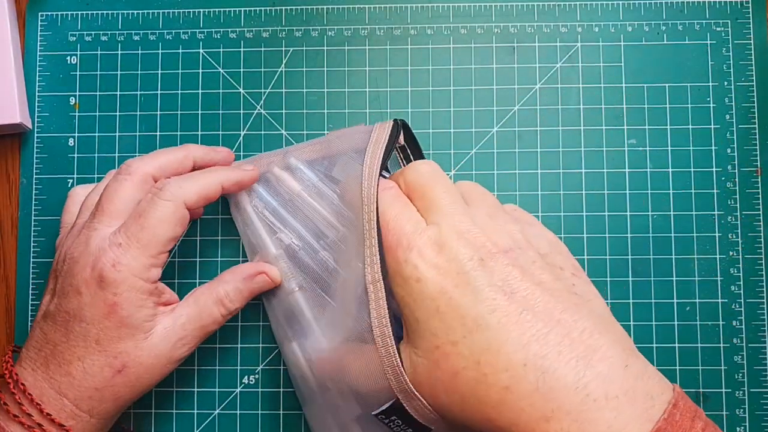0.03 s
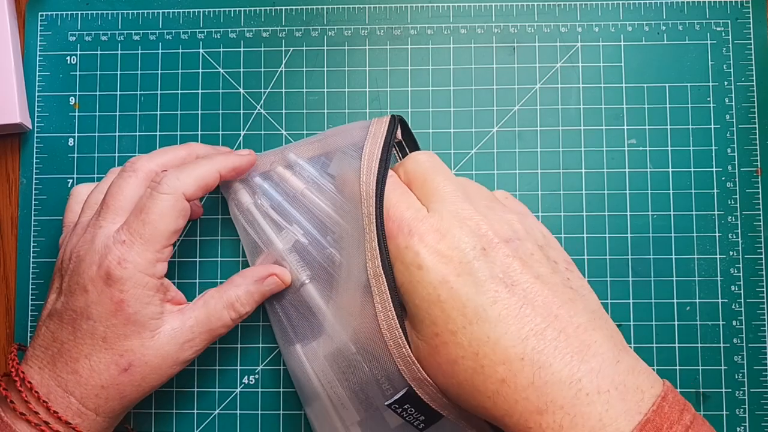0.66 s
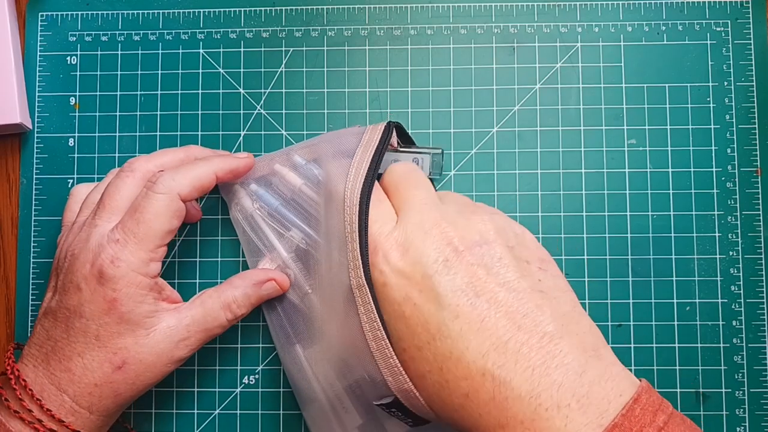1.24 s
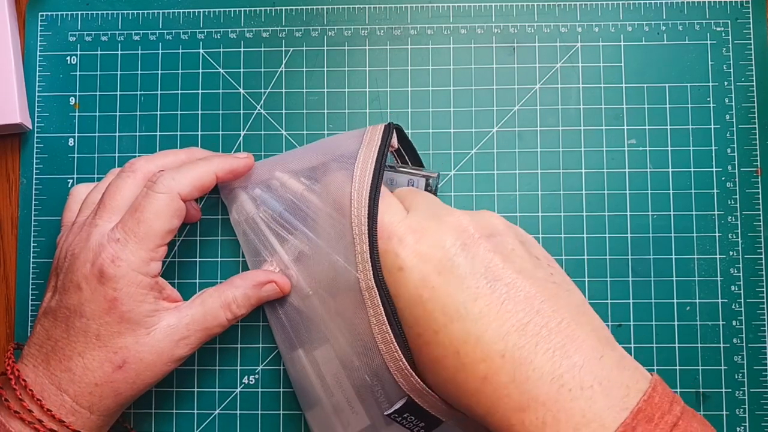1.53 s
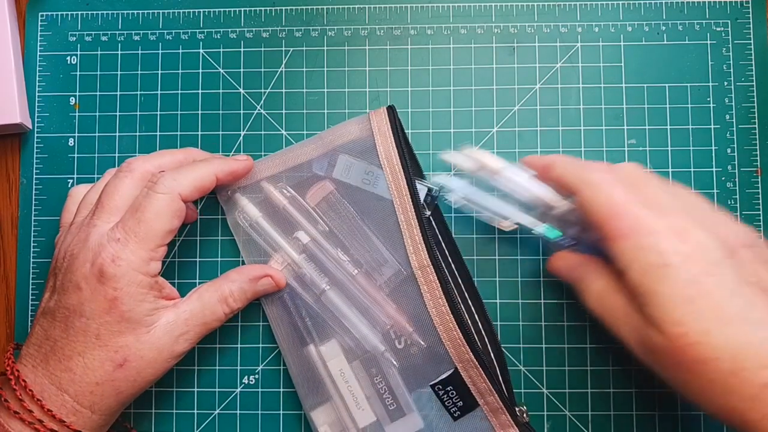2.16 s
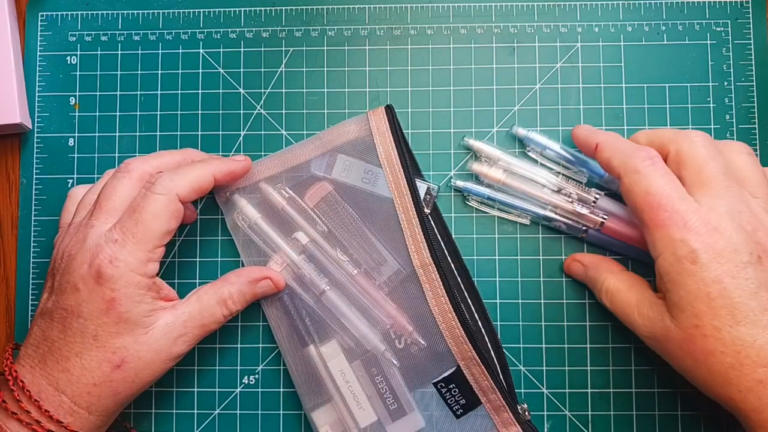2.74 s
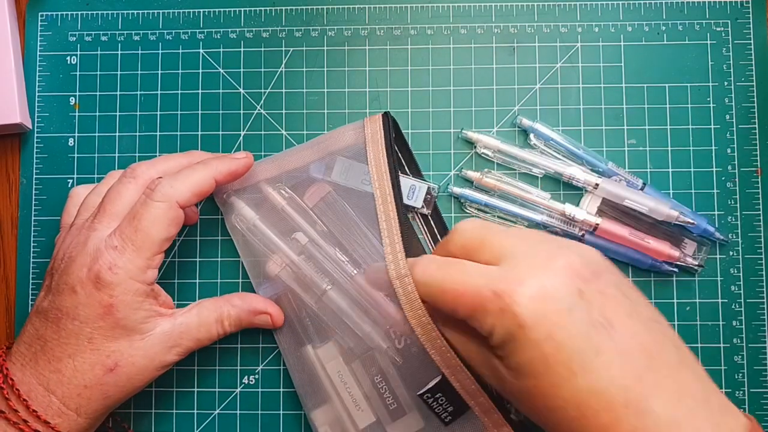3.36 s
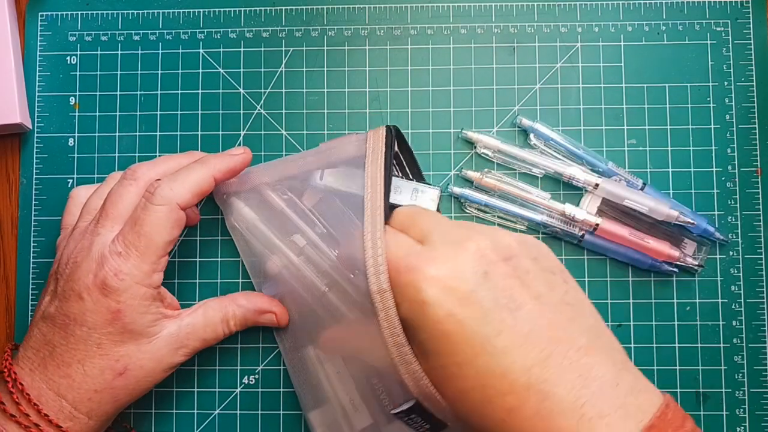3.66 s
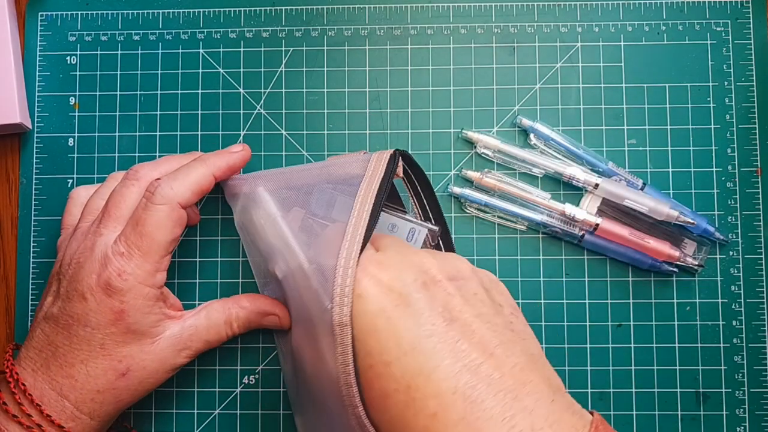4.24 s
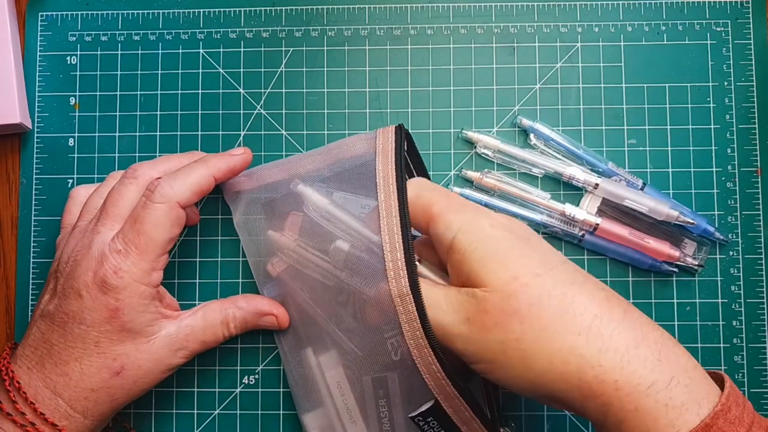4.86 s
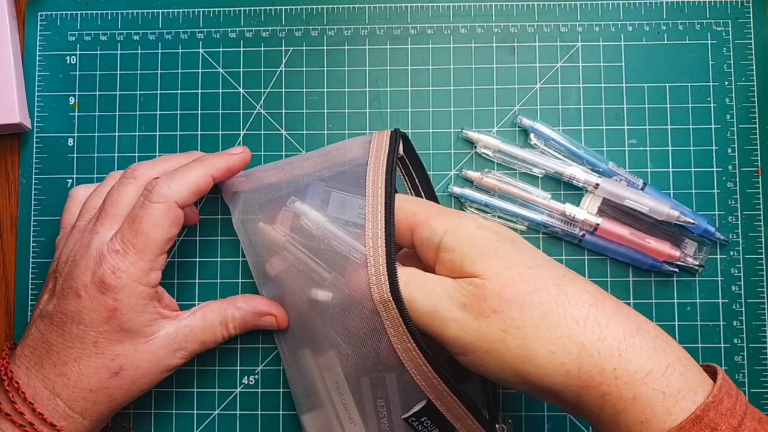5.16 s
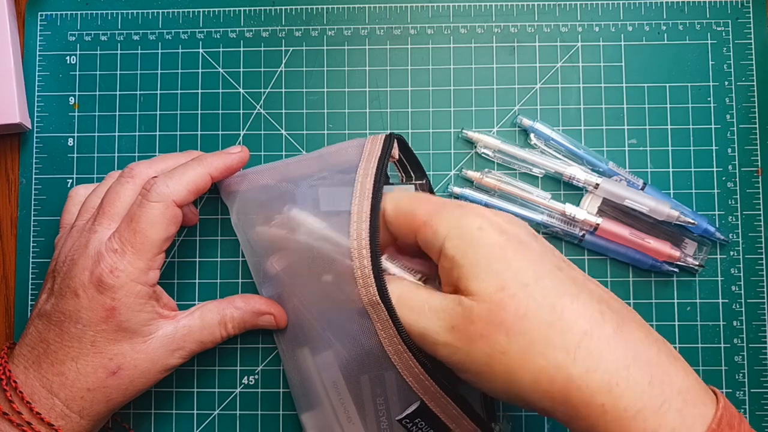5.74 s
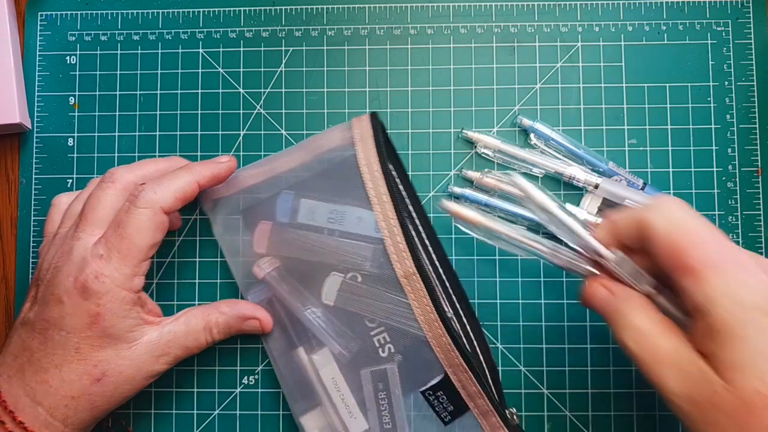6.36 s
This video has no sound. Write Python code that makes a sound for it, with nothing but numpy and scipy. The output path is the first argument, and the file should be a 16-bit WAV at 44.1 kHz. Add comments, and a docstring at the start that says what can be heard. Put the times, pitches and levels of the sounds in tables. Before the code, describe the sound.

A hand rummages in a soft plastic pouch, close and left of centre, with pens and pencils ticking together and the plastic crinkling. An engine idles faintly outside and stops. A bunch of pens is set down on a mat, clacking and rolling together with dull bumps on the desk. The digging resumes with more clicks and scrapes while a car passes faintly in the street. The stereo sound is close, in a small room.

```python
"""A desk in a small room, close stereo microphones. Left of centre a hand rummages in a soft plastic
zipper pouch: pens and pencils tick against each other, the film crinkles; an engine idles faintly outside.
At 2.3 s a bunch is set down on a cutting mat near the centre, where the hollow barrels clack and roll
together, and the engine stops. From 3.2 s the hand digs again, while out on the street a car goes by,
nearest at about 5 s and falling in pitch. The walls answer every contact briefly."""
import sys
import numpy as np
from scipy import signal
from scipy.fft import rfft, irfft, next_fast_len
from scipy.io import wavfile
from scipy.ndimage import map_coordinates

SR = 44100
rng = np.random.default_rng(int(sys.argv[2]) if len(sys.argv) > 2 else 0)


def wav_record(signal):
    """Record a signal, one row per channel, as 16-bit PCM in the file named by sys.argv[1]."""
    frames = np.transpose(np.atleast_2d(signal))
    bounded = np.clip(frames, -1, 1)
    # unit amplitude maps onto the largest positive 16-bit level
    quanta = np.round(bounded * 32767).astype(np.int16)
    wavfile.write(sys.argv[1], SR, quanta)


N = 286650


# the clearest contacts inside the pouch: start_s, barrel_db, click_db, tick_db, pitch_hz
POUCH_HITS = [(0.0341, -46, -51, -34.5, 3100), (0.2176, -82, -75, -48, 1300), (0.441, -69, -57, -52, 1800),
              (0.4715, -56.5, -50.5, -42.5, 2370), (0.6331, -71.5, -72, -42.5, 1510),
              (0.801, -62, -53, -43, 1900), (0.8063, -56, -44.5, -42, 2600),
              (0.8122, -55, -45, -32.5, 2900), (1.0621, -35, -36, -32, 4940), (1.1968, -78, -70, -52, 1800),
              (1.242, -47, -47, -32.5, 3480), (1.2542, -47, -42, -30, 2900), (1.2911, -50, -53, -49, 3200),
              (1.3218, -46.5, -46, -48, 3280), (1.35, -43, -41.5, -42.5, 2620),
              (1.4159, -47, -35.5, -29.5, 2600), (1.5298, -39, -43.5, -47, 3150),
              (1.5822, -54, -52, -42, 2700), (1.6695, -32, -33.5, -38, 3720),
              (1.7419, -58, -46.5, -50, 3480), (2.2633, -45.5, -45.5, -45.5, 4400),
              (3.2354, -70, -51.5, -42, 2560), (3.5491, -48.5, -44, -34, 1290),
              (3.6853, -61, -49, -39, 2730), (3.822, -49, -42, -33, 2770),
              (4.0871, -35.5, -34.5, -28, 2540), (4.1113, -43, -38, -31, 2670),
              (4.1566, -39.5, -38, -43, 3050), (4.1776, -45.5, -32.5, -36, 2420),
              (4.4854, -48, -58, -51, 2700), (4.6814, -53, -44, -49, 1800),
              (4.7061, -45.5, -39, -29.5, 2500), (4.7329, -42, -39.5, -32.5, 1935),
              (4.768, -48.5, -43.5, -38, 1580), (4.8245, -51.5, -43.5, -32.5, 1387),
              (5.2267, -57, -64.5, -47.5, 1500), (5.3387, -68, -59, -46, 1480),
              (5.394, -46.5, -37, -28.5, 2380), (5.4021, -43.5, -39, -31, 2240),
              (5.4461, -50, -43.5, -42, 2740), (5.5242, -53, -50, -37.5, 1800),
              (5.578, -49.5, -47, -39, 2180), (5.645, -80.5, -52, -49, 1510), (5.7137, -54, -53, -45, 2280),
              (5.7481, -46, -39, -41.5, 2520), (5.8947, -37.5, -36.5, -43, 3070),
              (5.9094, -36, -32.5, -43, 2700), (5.9513, -30, -29, -28, 3330),
              (5.9713, -62, -37.5, -33, 3100), (6.0168, -38.5, -40, -39, 2600)]
# spectrum of the desk knocked through the pouch: frequency_hz, level_db
POUCH_KNOCK_SPECTRUM = [(40, -17), (110, -16), (220, 7.5), (370, -0.5), (520, -2.5), (800, -11.5),
                        (1200, -0.5), (1700, 2), (2500, -14)]

def pouch_contacts():
    """Close, left of centre: pens jostle inside the pouch, damped by the grip."""
    hits = np.vstack([POUCH_HITS, light_touches()])
    return amp(0.5) * clatter(
        hits, pan_db=7.5, lag_s=.00012, barrel_t60=.009, click_t60=.0055, after_db=-59,
        near_db=-7, far_db=-7, knock_spectrum=POUCH_KNOCK_SPECTRUM, knock_db=-5.5, knock_t60=0.064)


# clacks of the bunch on the mat: start_s, barrel_db, click_db, tick_db, pitch_hz
MAT_HITS = [(2.3372, -44.5, -48.5, -51.5, 2660), (2.3714, -33, -46, -41, 2180),
            (2.385, -35.5, -44, -43, 2120), (2.395, -29, -37, -29.5, 2180),
            (2.4339, -27, -41.5, -33.5, 2420), (2.4581, -45.5, -51, -48, 2370),
            (2.4766, -48, -44.5, -50, 1200), (2.5645, -39, -45.5, -54, 2270),
            (2.5844, -43, -39.5, -39.5, 1620), (2.5998, -36, -42.5, -36, 2150),
            (2.6267, -40, -39, -26.5, 2190), (2.6365, -37.5, -51, -34, 1960),
            (2.6754, -39.5, -44, -45, 2070), (2.6943, -42.5, -41.5, -43, 2300),
            (2.7016, -38.5, -38.5, -30, 2270), (2.7203, -35, -37, -41, 2270),
            (2.7696, -34.5, -39, -36, 2930), (2.7766, -36.5, -37.5, -31, 2370),
            (2.8181, -37, -46, -48, 2000), (2.847, -42.5, -53, -50, 2900), (2.8554, -38, -44, -44, 2040),
            (2.8999, -45, -51.5, -50, 2110), (2.9782, -66, -54, -51, 2600)]
# spectrum of the desk knocked through the mat: frequency_hz, level_db
MAT_KNOCK_SPECTRUM = [(40, -26), (110, 3.5), (200, -14.5), (300, -5), (385, 0.5), (470, -2.5), (560, -4.5),
                      (680, -17), (800, -33), (1080, 5.5), (1300, -9.5), (2500, -19)]

def mat_contacts():
    """Close, near the centre: freed barrels keep a stronger after-ring and shake the mat."""
    return amp(-0.5) * clatter(
        MAT_HITS, pan_db=2, lag_s=.00001, barrel_t60=0.0072, click_t60=.007, after_db=-35,
        near_db=-9, far_db=-5.5, knock_spectrum=MAT_KNOCK_SPECTRUM, knock_db=-1, knock_t60=0.16)


def clatter(hits, pan_db, lag_s, barrel_t60, click_t60, after_db, near_db, far_db,
            knock_spectrum, knock_db, knock_t60):
    """Contacts and their echoes, later and softer on the right; each also knocks dully on the desk."""
    pens, knocks = np.zeros((2, 2, N))
    t = np.arange(SR // 5) / SR
    for start_s, barrel_db, click_db, tick_db, pitch_hz in hits:
        pair = contact(barrel_db, click_db, tick_db, pitch_hz, barrel_t60, click_t60, after_db)
        add(pens[:1], start_s, pair[:1])
        add(pens[1:], start_s + lag_s, pair[1:] * amp(-pan_db))
        add(pens, start_s, room(pair[0], near_db, far_db) * amp([[0], [-pan_db / 3]]))
        force = amp(knock_db + (barrel_db + click_db) / 2)
        shake = rng.standard_normal(len(t)) + 0.53 * rng.standard_normal((2, len(t)))
        add(knocks, start_s, force * amp(-60 * t / knock_t60) * shake)
    return pens + coloured(knocks, knock_spectrum)


# bending modes of the hollow barrels: frequency_hz, level_db
BARREL_MODES = [(1090, 9.5), (1330, -2), (1610, 2.5), (1702, 4), (1779, -0.5), (1906, 0.5), (2034, -9.5),
                (2116, -3), (2194, 1), (2317, -0.5), (2424, -2), (2548, -1.5), (2833, -8.5), (3138, 5),
                (3420, 0), (3725, -2), (4150, -4), (4520, 6.5), (4950, -6)]

def contact(barrel_db, click_db, tick_db, pitch_hz, barrel_t60, click_t60, after_db, width_octaves=0.3):
    """One touch: the barrel modes near its pitch, plus the snap of clips, tips and caps."""
    hz, db = np.transpose(BARREL_MODES)
    favoured_db = -3 * (np.log2(hz / pitch_hz) / width_octaves) ** 2
    detuned_hz = hz * (1 + 0.0083 * rng.standard_normal(len(hz)))
    barrel = ring(detuned_hz, db + favoured_db, barrel_t60, after_db)
    thin = signal.butter(2, 1150, "highpass", fs=SR, output="sos")  # a thin tube radiates little bass
    sound = amp(barrel_db) * signal.sosfilt(thin, barrel)
    click = amp(click_db) * snap(band_hz=(3900, 9800), t60=click_t60, correlation=0.72)
    tick = amp(tick_db) * snap(band_hz=(10500, 17000), t60=click_t60, correlation=0.34)
    add(sound, 0, click + tick)
    return sound


def ring(hz, db, t60, after_db, after_t60=0.12):
    """Struck modes at both microphones: damped at once, they leave a faint after-ring."""
    t = np.arange(SR // 8) / SR
    gain = amp(db + 2 * rng.standard_normal(len(hz)))
    left = gain * np.exp(2j * np.pi * rng.random(len(hz)))
    right = left * np.exp(0.23j * rng.standard_normal(len(hz)))  # each mode radiates its own way
    waves = np.array([left, right]) @ np.exp(2j * np.pi * hz[:, None] * t)
    decay = amp(-60 * t / t60) + amp(after_db - 60 * t / after_t60)
    attack = 1 - np.exp(-t / .0001)
    return unit_blow(waves.imag * decay * attack)


def snap(band_hz, t60, correlation):
    """A dry burst: small hard parts have crowded modes that die within milliseconds."""
    t = np.arange(SR // 16) / SR
    envelope = amp(-60 * t / t60) * (1 - np.exp(-t / 0.0012))
    left, other = rng.standard_normal((2, len(t))) * envelope
    right = correlation * left + np.sqrt(1 - correlation ** 2) * other
    band = signal.butter(2, band_hz, "bandpass", fs=SR, output="sos")
    return unit_blow(signal.sosfilt(band, [left, right]))


# how hard the hand rummages: time_s, level_db
HAND_EFFORT = [(0.0, -72.5), (0.25, -80.5), (0.45, -75.5), (0.78, -78.5), (1.0, -64.5), (1.45, -62),
               (1.95, -74.5), (2.1, -88), (3.3, -85), (3.7, -69), (4.05, -68), (4.27, -61), (4.56, -79),
               (4.84, -70.5), (5.2, -82), (5.47, -63), (5.85, -70), (6.12, -80)]
# spectrum of the rubbed plastic film: frequency_hz, level_db
FILM_SPECTRUM = [(300, -22), (1200, -7.5), (2000, -12.5), (2800, -4.5), (3800, -6), (4500, 0), (5500, -5.5),
                 (8000, 1.5), (10000, -5.5), (13000, 5.5), (16000, -7.5)]

def rustle():
    """At the pouch, skin and pens slide unevenly on the film: a soft hiss with tiny crinkles."""
    grip = amp(1.5 * wobble(16) + 1.2 * wobble(70))
    slide = amp(1) * noise(FILM_SPECTRUM, side_db=1, pan_db=8)
    crinkles = slips(FILM_SPECTRUM, per_second=260, size_db=5)
    return amp(curve(HAND_EFFORT) + 1) * grip * (slide + crinkles)


def light_touches(count=40, crowding=0.68, scatter_db=3, pitch_hz=2600):
    """Rows of chance contacts as the hand stirs the pens: more effort makes them denser and louder."""
    effort_db = curve(HAND_EFFORT)
    stirred = np.cumsum(amp(crowding * effort_db))
    starts = np.searchsorted(stirred / stirred[-1], (np.arange(count) + rng.random(count)) / count)
    chance = rng.standard_normal((count, 4))
    levels_db = effort_db[starts, None] + [4, 11, 15] + scatter_db * chance[:, :3]  # barrel, click, tick
    return np.column_stack([starts / SR, levels_db, pitch_hz * 2 ** (.3 * chance[:, 3])])


# pens dragged over each other and the film: start_s, length_s, hiss_db, barrel_db
PEN_DRAGS = [(.002, 0.043, -47, -54.5), (0.799, 0.088, -47, -58.5), (1.039, 0.057, -43, -48),
             (1.236, 0.058, -54, -64), (1.582, 0.17, -47.5, -57.5), (2.443, 0.045, -52, -47),
             (2.574, 0.12, -42.5, -50), (2.684, 0.16, -57, -52.5), (3.224, 0.077, -56, -82),
             (3.511, 0.069, -47.5, -84), (3.79, 0.077, -44, -65), (4.034, 0.19, -42.5, -55),
             (4.083, 0.05, -39.5, -53), (4.339, 0.055, -51.5, -55), (4.699, 0.034, -43.5, -51.5),
             (5.383, 0.059, -43.5, -61), (5.72, 0.046, -55, -57), (5.837, 0.2, -43.5, -46),
             (6.238, .36, -56, -75)]
# spectrum of a skidding barrel: frequency_hz, level_db
SKID_SPECTRUM = [(400, -15.5), (1200, -7), (2000, -11.5), (2500, 8), (2850, 3.5), (3200, -3.5), (3800, 1),
                 (4400, -2), (5300, -3.5), (7000, -22), (16000, -35)]

def scrapes(catch_db=2.5, catches_per_second=55):
    """Close, on the left: a dragged pen catches and slips; the film hisses, the barrel rasps."""
    film_swells = sum(amp(db) * swell(s, length) for s, length, db, _ in PEN_DRAGS)
    barrel_swells = sum(amp(db) * swell(s, length) for s, length, _, db in PEN_DRAGS)
    catching = amp(catch_db * wobble(catches_per_second))
    hiss = film_swells * slips(FILM_SPECTRUM, per_second=1400, size_db=4.5)
    rasp = barrel_swells * slips(SKID_SPECTRUM, per_second=600, size_db=3.5)
    return catching * (hiss + rasp)


def slips(spectrum, per_second, size_db):
    """Dense tiny stick-slip grains with their echoes, rms 1."""
    slipping = rng.random(N) < per_second / SR
    sizes = amp(size_db * np.minimum(rng.exponential(size=N), 3))
    grains = slipping * sizes * rng.choice([-1, 1], N)
    direct = np.array([grains, np.roll(grains, 5) * amp(-4)])  # later and softer on the right
    echoes = room(grains, near_db=-4, far_db=-0.95)[:, :N]
    return unit(coloured(direct + echoes, spectrum))


# soft bumps of pens and knuckles, in the pouch and on the mat: start_s, level_db
BUMPS = [(.008, -52.5), (.842, -54.5), (1.063, -53.5), (1.262, -53.5), (1.362, -57.5), (1.715, -65.5),
         (2.395, -53), (2.601, -55), (2.634, -51.5), (2.724, -48), (2.777, -46.5), (4.099, -53),
         (5.951, -48)]
# spectrum of the desk's boom: frequency_hz, level_db
BOOM_SPECTRUM = [(40, -34), (110, 6), (170, -3.5), (240, 0.5), (300, 0), (380, 4), (460, 0.5), (560, -9),
                 (660, -8), (800, -17), (1500, -47)]

def thuds(t60=0.2):
    """Close, centred: each bump of the hand, in the pouch or on the mat, becomes a dull boom of the desk."""
    bumps = np.zeros((2, N))
    t = np.arange(SR // 4) / SR
    for start_s, db in BUMPS:
        shake = rng.standard_normal(len(t)) + 0.29 * rng.standard_normal((2, len(t)))
        add(bumps, start_s, amp(db - 60 * t / t60) * shake)
    band_gain = rms(amp(along(BOOM_SPECTRUM, np.linspace(0, SR / 2, SR))))
    return coloured(bumps, BOOM_SPECTRUM) / band_gain


# brief faint low hums: start_s, length_s, pitch_hz, level_db
LOW_HUMS = [(0.338, 0.16, 310, -70), (4.19, 0.11, 240, -61), (6.292, 0.16, 141.7, -63)]
# spectrum of the rumbling desk: frequency_hz, level_db
DESK_SPECTRUM = [(20, -16.5), (45, -1), (90, 1.5), (140, 0), (185, -6.5), (240, -0.5), (320, -15.5),
                 (420, -13.5), (600, -21.5), (1500, -46.5)]

def desk_rumble(rest_db=-71, easy_search_db=-70):
    """The desk rumbles with the hand's effort and with every drag; now and then a low hum swells."""
    t = np.arange(N) / SR
    hums = sum(amp(db) * swell(s, length) * unit(np.sin(2 * np.pi * hz * t + 0.43 * wobble(40)))
               for s, length, hz, db in LOW_HUMS)
    push = amp(easy_search_db + 0.49 * (curve(HAND_EFFORT) - easy_search_db))
    drags = sum(amp(db - 22) * swell(s, length) for s, length, db, _ in PEN_DRAGS)
    shaking = np.sqrt(amp(rest_db) ** 2 + push ** 2 + drags ** 2)
    sway = amp(2 * wobble(8.7))
    return shaking * sway * noise(DESK_SPECTRUM, side_db=-11, pan_db=2) + hums


# decay of the small room: frequency_hz, t60_s
WALL_DECAY = [(200, 0.097), (2000, 0.25), (6000, 0.16), (15000, 0.12)]
# spectrum of its echo: frequency_hz, level_db
WALL_SPECTRUM = [(200, 20), (2000, -1.5), (5000, -0.5), (9000, -1.5), (15000, -0.5)]

def room(sound, near_db, far_db, near_t60=0.018, wall_gap_s=.0085):
    """Quick scatter from desk and hands, then the walls' tail; new for each place."""
    hz, t, bins = signal.stft(rng.standard_normal((2, SR // 3)), SR, nperseg=256)
    fade = amp(along(WALL_SPECTRUM, hz)[:, None] - 60 * t / along(WALL_DECAY, hz)[:, None])
    tail = signal.istft(bins * fade, SR, nperseg=256)[1]
    t = np.arange(tail.shape[1]) / SR
    tail *= 1 - np.exp(-(t / wall_gap_s) ** 4)
    near = rng.standard_normal(tail.shape) * amp(-60 * t / near_t60)
    near *= 1 - np.exp(-(t / 0.0029) ** 2)
    answer = amp(far_db) * tail / np.linalg.norm(tail[0]) + amp(near_db) * near / np.linalg.norm(near[0])
    return signal.fftconvolve(sound[None], answer, axes=1)


# tyre noise of the passing car: time_s, level_db
TYRE_LEVELS = [(3.5, -73), (3.7, -68), (4.2, -59), (4.45, -68.5), (4.85, -55.5), (5.2, -64), (5.84, -63),
               (6.5, -74)]
# spectra of its motor, near tyres, far tyres and singing tread: frequency_hz, level_db
MOTOR_SPECTRUM = [(25, -29), (45, -12.5), (70, -5), (93, -3), (115, -7.5), (170, -22), (400, -44)]
NEAR_TYRE_SPECTRUM = [(200, -20), (420, -2), (560, -2.5), (690, 2.5), (830, 11), (920, 2.5), (1020, -0.5),
                      (1230, 2.5), (1450, -6.5), (1800, -5.5), (2600, -19), (5000, -54)]
FAR_TYRE_SPECTRUM = [(200, -13.5), (400, -18.5), (650, -7.5), (830, -3), (1000, -3.5), (1200, -1),
                     (1450, 0.5), (1750, -5), (2300, -12.5), (3500, -30.5), (8000, -51)]
TREAD_SPECTRUM = [(600, -26.5), (770, -15.5), (825, 8), (880, -6.5), (1100, -55)]

def passing_car(start_s=2.87, attack_s=1.0, leave_s=4.63, release_s=0.21):
    """Out on the street a motor drones as it comes on; the tyres sing and grow fuller as they near."""
    t = np.arange(N) / SR
    coming = np.clip((t - start_s) / attack_s, 0, 1)
    leaving = np.exp(-np.maximum(t - leave_s, 0) / release_s)
    motor = amp(-61) * coming * leaving * noise(MOTOR_SPECTRUM, side_db=-5, pan_db=4.5)
    tyre_db = curve(TYRE_LEVELS)
    nearness = np.clip((tyre_db - tyre_db.max()) / 11 + 1.5, 0, 1)
    near = noise(NEAR_TYRE_SPECTRUM, side_db=-4.5, pan_db=0.65)
    far = noise(FAR_TYRE_SPECTRUM, side_db=2.4, pan_db=5.9)
    tread = amp(-9) * noise(TREAD_SPECTRUM, side_db=-18.5, pan_db=0.5)
    tyres = np.sqrt(nearness) * (near + tread) + np.sqrt(1 - nearness) * far
    return motor + amp(tyre_db + wobble(7.4)) * tyres


# the tyres' roar as the car passes the room: time_s, pitch_hz, level_db
ROAR_GLIDE = [(3.4, 827, -100), (4.2, 826, -69), (4.549, 786.4, -70.5), (4.749, 737, -61),
              (4.921, 651, -63.5), (5.08, 571, -69), (5.4, 520, -95.5)]

def tyre_roar(width_hz=260):
    """From the street, a narrow roar that glides down with the Doppler shift."""
    glide = np.array(ROAR_GLIDE)
    phase = 2 * np.pi * np.cumsum(curve(glide[:, [0, 1]])) / SR
    roar = unit(wobble(width_hz) * np.cos(phase) + wobble(width_hz) * np.sin(phase))
    return roar * amp(curve(glide[:, [0, 2]])) * amp([[1], [-1]])


# hum of the idling engine: time_s, level_db
IDLE_LEVELS = [(0.0, -61.5), (0.3, -86), (0.62, -73), (0.8, -61), (1.42, -54), (2.39, -65), (2.5, -81)]

def idling_engine(pitch_hz=67.2, stop_s=2.55, fade_s=0.16):
    """Outside, to the left, an engine hums, then stops."""
    phase = 2 * np.pi * np.cumsum(pitch_hz + 0.61 * wobble(4.87)) / SR
    running = np.clip((stop_s - np.arange(N) / SR) / fade_s, 0, 1)
    hum = unit(np.sin(phase) + amp(-14) * np.sin(2 * phase))
    return hum * running * amp(curve(IDLE_LEVELS) + wobble(11)) * amp([[0.5], [-5.5]])


# wash of distant traffic: time_s, level_db
TRAFFIC_LEVELS = [(0.0, -70.5), (1.5, -76), (2.2, -85), (6.5, -78)]

def distant_traffic():
    """Far off, tyres blend into a wide, faint wash."""
    return amp(curve(TRAFFIC_LEVELS)) * noise(FAR_TYRE_SPECTRUM, side_db=4.8, pan_db=2.7)


# spectrum of the noise floor: frequency_hz, level_db
FLOOR_SPECTRUM = [(100, 11), (2000, -20), (4000, -7), (8000, 2), (13000, 9), (16000, 4.5)]

def noise_floor():
    """A faint steady hiss at both microphones."""
    return amp(-77) * noise(FLOOR_SPECTRUM, side_db=0, pan_db=0.88)


def amp(db):
    """Decibels to gain."""
    return 10 ** (np.asarray(db) / 20)


def rms(x):
    """Root mean square, never zero."""
    return np.sqrt(np.mean(x ** 2) + 1e-20)


def unit(x):
    """Scaled to rms 1."""
    return x / rms(x)


def unit_blow(pair, blow_s=.004):
    """Scaled to rms 1 over the opening blow at the left microphone."""
    return pair / rms(pair[0, :round(blow_s * SR)])


def along(points, hz):
    """(frequency_hz, value) points read on a log axis."""
    point_hz, values = np.transpose(points)
    return np.interp(np.log(hz + 1), np.log(point_hz + 1), values)


def curve(rows):
    """(time_s, value) rows as one value per sample."""
    return np.interp(np.arange(N) / SR, *np.transpose(rows))


def wobble(rate):
    """A smooth random curve, rate knots a second."""
    return map_coordinates(rng.standard_normal(int(N * rate / SR) + 4), [np.arange(N) * rate / SR])


def swell(start_s, length_s):
    """A smooth swell from 0 to 1 and back."""
    return np.sin(np.pi * np.clip((np.arange(N) / SR - start_s) / length_s, 0, 1))


def filtered(x, response):
    """x times a response of frequency."""
    size = next_fast_len(N + SR // 4)
    return irfft(rfft(x, size) * response(np.fft.rfftfreq(size, 1 / SR)), size)[..., :N]


def coloured(x, spectrum):
    """x shaped by (frequency_hz, level_db) points."""
    return filtered(x, lambda hz: amp(along(spectrum, hz)))


def noise(spectrum, side_db, pan_db):
    """Stereo noise of rms 1; side_db sets the width, pan_db is left minus right."""
    mid, side = rng.standard_normal((2, N))
    pair = np.array([mid + amp(side_db) * side, mid - amp(side_db) * side])
    return unit(coloured(pair, spectrum) * amp([[pan_db / 2], [-pan_db / 2]]))


def add(track, start_s, sound):
    """Mix a sound in at start_s."""
    start = max(0, round(start_s * SR))
    part = track[:, start:start + sound.shape[1]]
    part += sound[:, :part.shape[1]]


def scene():
    """The desk close to the two microphones, the street beyond the walls."""
    desk = pouch_contacts() + mat_contacts() + thuds() + scrapes() + rustle() + desk_rumble()
    street = idling_engine() + passing_car() + tyre_roar() + distant_traffic()
    return desk + street + noise_floor()


# response of the duller right microphone: frequency_hz, gain_db
RIGHT_MIC_RESPONSE = [(2500, -2), (5500, 2.5), (8000, -3), (12000, -10), (16000, -6.5)]

def record(dry, top_hz=16150):
    """The right microphone loses treble; both channels cut off steeply at the band limit."""
    pair = np.array([dry[0], coloured(dry[1], RIGHT_MIC_RESPONSE)])
    return filtered(pair, lambda hz: 1 / np.sqrt(1 + (hz / top_hz) ** 200))


dry = scene()
out = record(dry)
wav_record(out)
```